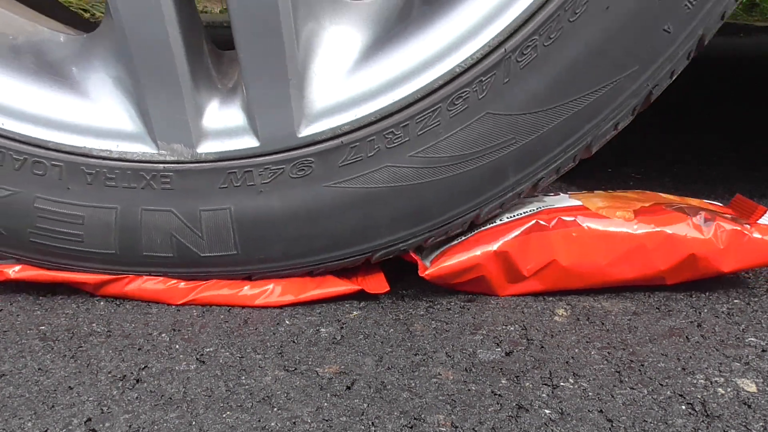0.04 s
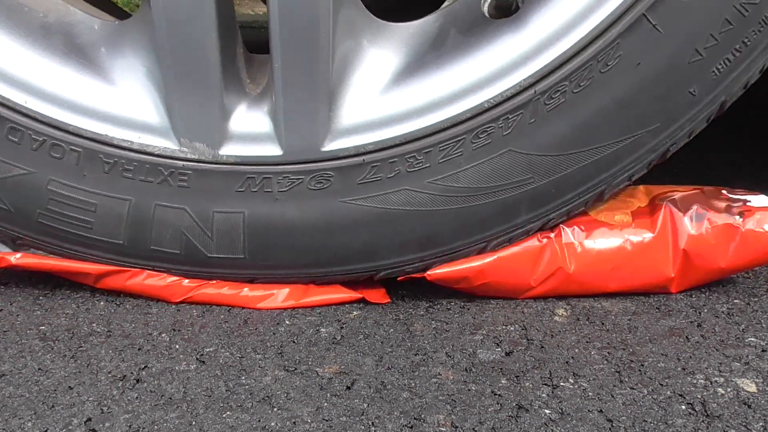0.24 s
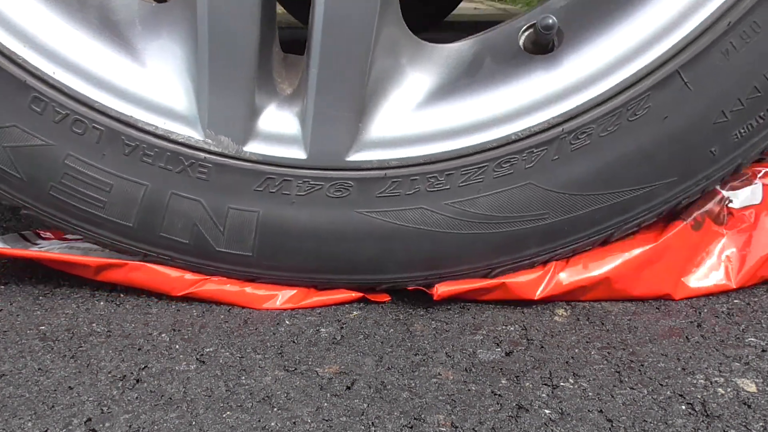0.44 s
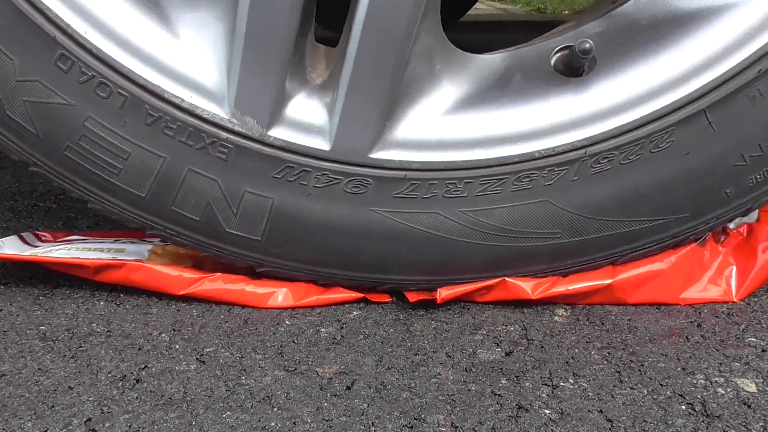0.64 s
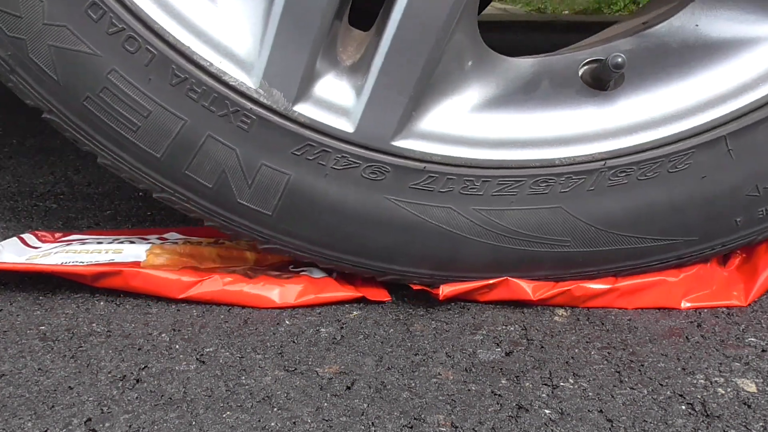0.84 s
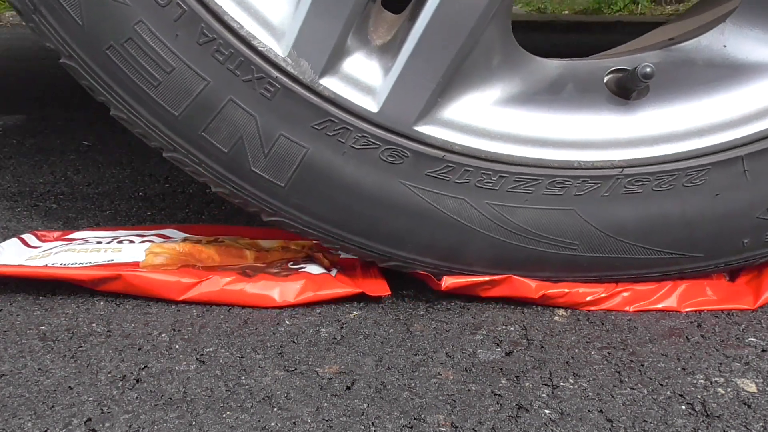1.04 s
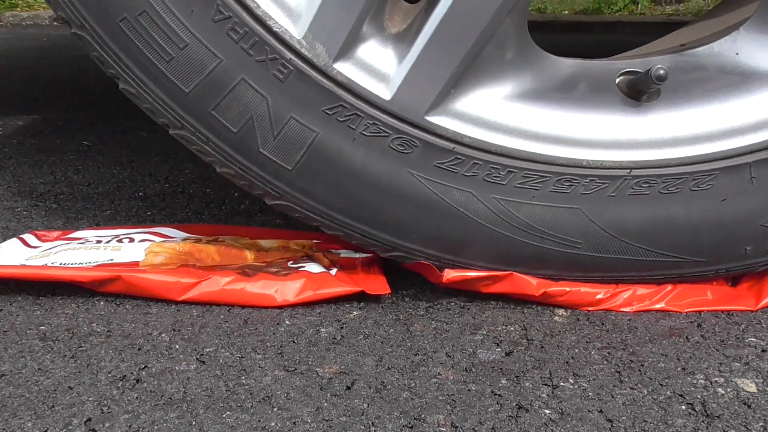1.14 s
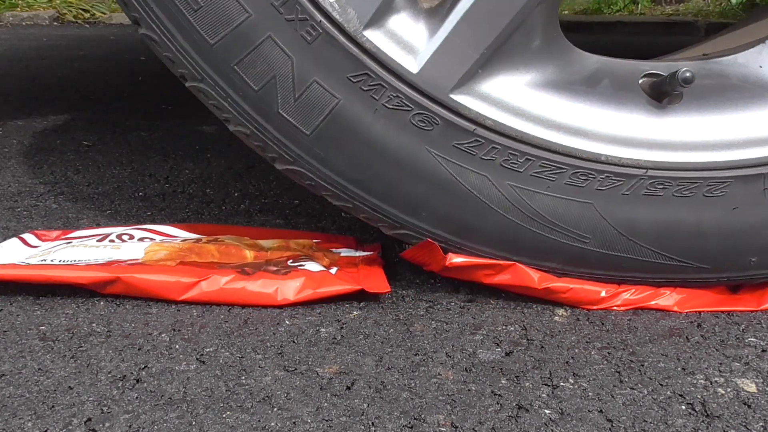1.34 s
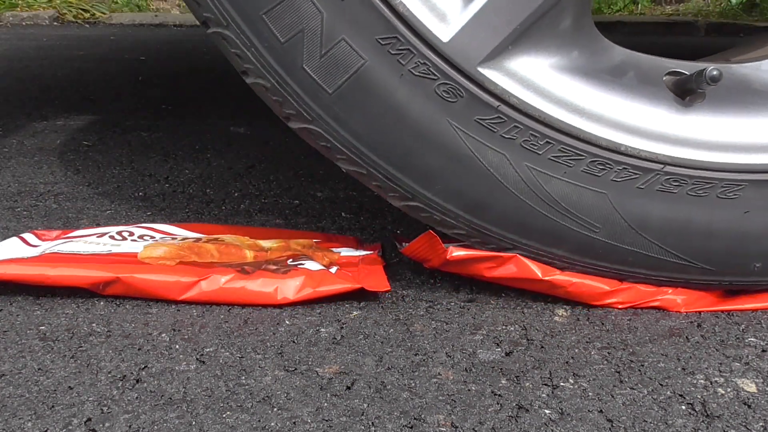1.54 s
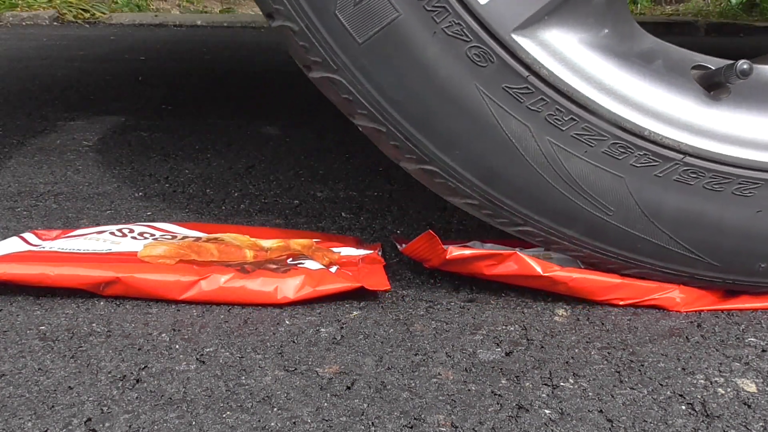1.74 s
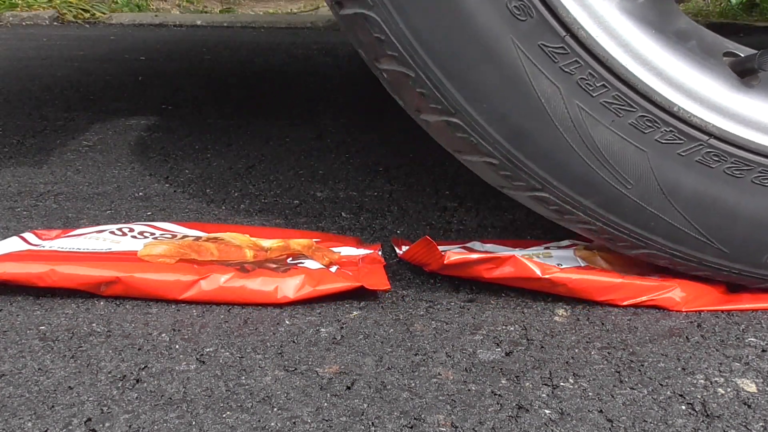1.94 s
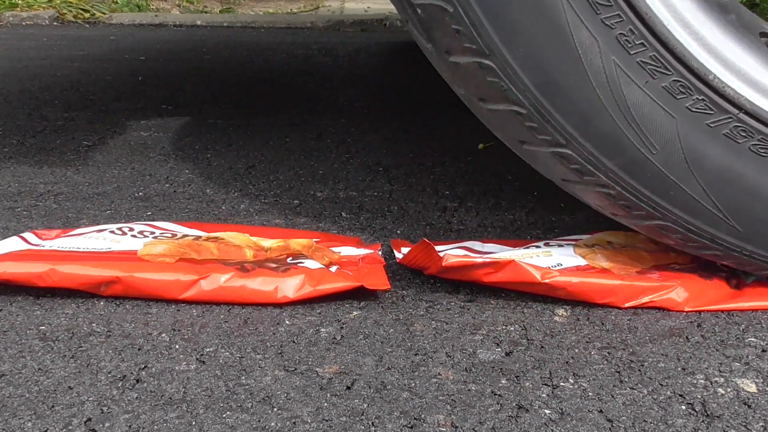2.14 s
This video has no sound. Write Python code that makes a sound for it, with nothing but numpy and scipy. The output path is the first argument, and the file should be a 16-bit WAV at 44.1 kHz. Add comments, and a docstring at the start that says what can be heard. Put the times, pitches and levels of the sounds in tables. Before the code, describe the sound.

Foil crisp bags crunch and snap under a tyre, heard very close outdoors; hollow pops quicken, a full bag bangs open with a short echo, then softer scattered crackles remain above low car rumble.

```python
"""Tyre rolling over snack packets

A car tyre rolls slowly over snack packets on asphalt, close to two microphones in the open.
Creasing film snaps as short resonant ticks, walls pop hollowly, and swarms of grains crinkle and crunch.
A full packet bursts as a tear of noise, decaying modes that sink in pitch and a short echo.
Softer crackles of the flattened packets follow, over filtered noise and a wavering hum of the car.
"""
import sys
import numpy as np
from scipy import signal
from scipy.fft import rfft, irfft
from scipy.io import wavfile

SR = 44100
rng = np.random.default_rng(int(sys.argv[2]) if len(sys.argv) > 2 else 0)


def unload_wav(signal):
    """Save mono or channel-first audio to the path in sys.argv[1] as 16-bit WAV at rate SR, clipped to [-1, 1]."""
    wavfile.write(
        sys.argv[1],
        SR,
        np.round(np.clip(np.atleast_2d(signal).T, -1, 1) * 32767).astype(np.int16),
    )


N = 97020  # length [samples]
SIDES = np.array([[1], [-1]])  # signs of the two channels
LEVEL_WINDOW_S = 0.003  # the level of a tick is its rms over this time
FLIP_CYCLES = 2.1  # decay of the ragged instant in which a fold gives way [periods of the tick]
RING_FLIP_DB, POP_FLIP_DB, THUD_FLIP_DB, GRAIN_FLIP_DB = -4, -12.5, -16, -4.5  # raggedness
# between the two microphones: mean lag, random spread of the lag, random spread of the level
LAG_S, LAG_SPREAD_S, PAN_SPREAD_DB = 1.2e-5, 1.4e-5, -2.5
CROWDING = 0.6  # how closely the rate of the grains follows their level [exponent]


def amp(db):
    """Decibels to gain."""
    return 10 ** (np.asarray(db) / 20)


def unit(x):
    """Scale to an rms of one."""
    return x / np.sqrt(np.mean(x ** 2))


def resonance(f, hz, q):
    """Response of a band-pass applied twice."""
    return 1 / (1 + 1j * q * (f / hz - hz / np.maximum(f, 1))) ** 2


def band(x, hz, q):
    """Pass a sound through one resonance."""
    f = np.fft.rfftfreq(N, 1 / SR)
    return irfft(rfft(x) * resonance(f, hz, q), N)


def colour(x, points):
    """Filter by (frequency [Hz], level [dB]) points, joined along log frequency."""
    hz, db = np.array(points).T
    f = np.fft.rfftfreq(N, 1 / SR)
    gain = amp(np.interp(np.log(f + 1), np.log(hz), db))
    return irfft(rfft(x) * gain, N)


def stereo_noise(apart):
    """White noise common to both channels plus a share of separate noise in each."""
    return rng.standard_normal(N) + apart * rng.standard_normal((2, N))


def decay(t, t60):
    """Exponential fall by 60 dB in t60 seconds."""
    return np.exp(-np.log(1000) * t / t60)


def ticks(times, db, hz, q, tail_db, tail_s, apart, flip_db, size=1024):
    """Each tick is a ragged impulse and a short scatter through its own resonance."""
    t, f = np.arange(size) / SR, np.fft.rfftfreq(size, 1 / SR)
    hz = hz[:, None, None]
    chance = rng.standard_normal((len(times), 3, size))
    common, separate = chance[:, :1], chance[:, 1:]

    def fade(length):
        return np.exp(-t / length) * np.sqrt(2 / (length * SR))

    apart = np.clip(apart, 0, 1)
    scatter = np.sqrt(1 - apart) * common + np.sqrt(apart) * separate
    scatter = scatter * fade(tail_s)
    flip = 1 + amp(flip_db) * rfft(common[..., ::-1] * fade(FLIP_CYCLES / hz))
    lag = LAG_S + LAG_SPREAD_S * common[..., -1:]
    delay = 4 / SR + SIDES * lag / 2  # four samples of headroom keep both delays positive
    pan = amp(SIDES * PAN_SPREAD_DB * chance[:, 1:2, -1:] / 2)
    direct = flip * np.exp(-2j * np.pi * f * delay) * pan
    sounds = irfft((direct + amp(tail_db) * rfft(scatter)) * resonance(f, hz, q), size)
    energy = np.sum(sounds ** 2, axis=(1, 2), keepdims=True)
    sounds /= np.sqrt(energy / (2 * LEVEL_WINDOW_S * SR))

    out = np.zeros((2, N + size))
    starts = np.clip(times * SR, 0, N - 1).astype(int)
    for start, gain, sound in zip(starts, amp(db), sounds):
        out[:, start:start + size] += gain * sound
    return out[:, :N]


def swarm(count, s, level_db, spread_db, group=20):
    """Times and levels of grains: they crowd where the crushing is hard, a strong one in every handful."""
    t = np.arange(N) / SR
    db = np.interp(t, s, level_db)
    rate = amp(CROWDING * db)
    rate = rate * count / (rate.sum() / SR)  # grains per second
    order = np.arange(count) + 2 * rng.random(count)
    times = np.interp(order, np.cumsum(rate) / SR, t)
    # ranks shuffled within each group; the cube leaves most grains faint
    rank = np.argsort(rng.random((count // group, group))).ravel()
    size_db = spread_db * ((rank + rng.random(count)) / group) ** 3
    # the summed power of overlapping grains follows the level curve
    power = np.mean(amp(size_db) ** 2) * LEVEL_WINDOW_S * np.interp(times, t, rate)
    return times, size_db + np.interp(times, t, db) - 10 * np.log10(power)


RING_Q, RING_TAIL_DB, RING_TAIL_S, RING_DB = 1.74, -8.5, 0.004, -1.5
BODY_HZ, BODY_Q, BODY_TAIL_DB, BODY_TAIL_S, BODY_DB = 3070, 0.39, 2.5, 0.004, 1
# Sharp snaps of the film, levels before the trims RING_DB and BODY_DB:
# (time [s], ring frequency [Hz], ring level [dB], level of the duller body [dB])
FILM_SNAPS = [(.0193, 10100, -27, -34), (0.034, 7960, -24, -37), (.098, 10100, -17, -29.5),
              (0.1239, 10900, -25, -29.5), (0.2166, 10000, -20, -29.5), (0.2198, 10900, -18.5, -28.5),
              (0.2522, 9600, -26, -46), (0.3041, 10900, -17.5, -32), (0.3602, 7200, -25.5, -26.5),
              (0.399, 9400, -20.5, -26), (.434, 9900, -21.5, -24), (0.4787, 11000, -15.5, -28.5),
              (0.5248, 9900, -25, -22), (0.5581, 10400, -17, -35), (.615, 10200, -28, -61),
              (0.7037, 9200, -33, -37), (.717, 8500, -41, -36), (0.9641, 10300, -34, -38),
              (0.986, 8800, -27, -37.5), (1.017, 7800, -33, -38), (1.0316, 8550, -19, -50),
              (1.058, 7000, -28, -34), (1.076, 7050, -22.5, -42), (1.0964, 7150, -25, -30),
              (1.1337, 9000, -27.5, -49), (1.1658, 7500, -21.5, -27), (1.294, 9900, -24.5, -41),
              (1.3443, 5630, -42, -36.5), (1.4002, 8800, -32, -48), (1.422, 9600, -28, -36.5),
              (1.458, 7740, -28, -34.5), (1.4815, 9100, -22.5, -27), (1.5076, 8300, -30, -52),
              (1.518, 10900, -31, -32), (1.527, 10600, -27.5, -34.5), (1.5448, 7620, -37, -47),
              (1.565, 8700, -24, -35), (1.6, 7460, -25.5, -29.5), (1.616, 7300, -29, -34.5),
              (1.6657, 7240, -32.5, -38), (1.7623, 9400, -26, -29.5), (1.7699, 7300, -23, -34),
              (1.7948, 10100, -24, -32.5), (1.877, 7500, -45, -37), (1.9226, 8100, -32, -41),
              (1.9885, 7840, -29, -34), (2.0525, 9900, -19, -46), (2.0765, 7900, -38, -51),
              (2.102, 10400, -31, -34.5), (2.1361, 7000, -34.5, -45)]


def snaps():
    """Creases flip over: a bright ring and a duller body."""
    s, hz, ring_db, body_db = np.array(FILM_SNAPS).T
    body_hz = BODY_HZ * np.exp(0.11 * rng.standard_normal(len(s)))
    ring = ticks(s, ring_db + RING_DB, hz, RING_Q, RING_TAIL_DB, RING_TAIL_S, 0.5, RING_FLIP_DB)
    body = ticks(s, body_db + BODY_DB, body_hz, BODY_Q, BODY_TAIL_DB, BODY_TAIL_S, 0.19, RING_FLIP_DB)
    return ring + body


BURST_S, BURST_RISE_S, BURST_LOW_HZ = 0.5563, 0.0012, 88  # start, rise, low cut
RING_TRIM_DB = 7  # added to every mode
BURST_SAG, BURST_SAG_S = 0.15, 0.0264  # share by which the pitch sinks as the packet slackens, and how soon
RIP_DB, RIP_S, RIP_HZ = -11.5, 0.0056, 5400  # the seam tears
ECHO_DB, ECHO_T60_S, ECHO_HZ = -22, 0.19, 580  # scatter from the car body and the street
# Ring of the bursting packet, pitch before it sinks and level before the trim:
# (frequency [Hz], level [dB], decay time to -60 dB [s])
PACKET_MODES = [(167.5, -15.5, 0.041), (338, -17, 0.055), (550, -7, 0.039), (610.4, -8.5, 0.059),
                (699, -9, 0.049), (854, -16.5, 0.045), (1000, -19.5, 0.041), (1280, -18.5, 0.029),
                (1920, -25, 0.024)]


def burst():
    """The seam rips, the freed air rings the slackening packet, and the surroundings answer."""
    t = np.maximum(np.arange(N) / SR - BURST_S, 0)
    rise = 1 - np.exp(-t / BURST_RISE_S)  # silent until the burst
    sag = BURST_SAG * np.minimum(t / BURST_SAG_S, 1) ** 2
    slack_time = t - np.cumsum(sag) / SR  # time runs slower, so every mode sinks
    ring = np.zeros(N)
    for hz, db, t60 in PACKET_MODES:
        ring -= amp(db) * np.sin(2 * np.pi * hz * slack_time) * decay(t, t60)
    rip = amp(RIP_DB) * unit(band(stereo_noise(0.76), RIP_HZ, 0.21)) * np.exp(-t / RIP_S)
    echo = amp(ECHO_DB) * unit(band(stereo_noise(0.69), ECHO_HZ, 1.42)) * decay(t, ECHO_T60_S)
    low_cut = signal.butter(2, BURST_LOW_HZ, "high", fs=SR, output="sos")
    return signal.sosfilt(low_cut, rise * (amp(RING_TRIM_DB) * ring + rip + echo))


POP_Q, POP_TAIL_DB, POP_TAIL_S, POP_TOP_HZ = 0.48, -5, 0.0071, 1420
# Pops of buckling packet walls and breaking crisps, levels before the treble cut:
# (time [s], level [dB], pitch [Hz])
WALL_POPS = [(0.125, -23, 460), (0.1771, -25, 850), (0.2184, -19.5, 836), (.246, -25.5, 776),
             (0.3207, -21, 580), (0.3597, -21.5, 408), (0.3986, -19.5, 1100), (0.41, -16, 1060),
             (0.4437, -10, 650), (0.5246, -13.5, 714), (.732, -30, 280), (0.964, -31.5, 990),
             (1.059, -28.5, 415), (1.0875, -26, 563), (1.1628, -28.5, 616), (1.2941, -31, 940),
             (1.465, -37, 240), (1.922, -32, 1100)]


def pops():
    """Hollow pops of the packet, one swing of its wall each, with little treble."""
    s, db, hz = np.array(WALL_POPS).T
    swings = ticks(s, db, hz, POP_Q, POP_TAIL_DB, POP_TAIL_S, 0.15, POP_FLIP_DB, size=4096)
    treble_cut = signal.butter(4, POP_TOP_HZ, fs=SR, output="sos")
    return signal.sosfilt(treble_cut, swings)


# Small crackles, as level curves of the film and of the crisps, played by crinkle() and crunch():
# (time [s], film treble level [dB], film middle level [dB], crisp crunch level [dB])
CRUSH_LEVELS = [(0, -40, -46, -33), (.03, -32, -36.5, -36.5), (.07, -40, -49, -40),
                (.14, -31.5, -37.5, -36.5), (.25, -29.5, -40.5, -35), (.32, -27, -34, -29.5),
                (.43, -30.5, -37, -37), (.5, -33.5, -43.5, -47), (.6, -51.5, -58.5, -54),
                (.69, -50, -56.5, -50), (0.738, -40, -42, -38), (0.809, -42, -55, -46),
                (.87, -41, -45, -41.5), (1.01, -43.5, -53.5, -49.5), (1.07, -40, -47.5, -40.5),
                (1.2, -47.5, -52, -57), (1.33, -42, -47.5, -52), (1.6, -47.5, -51, -52),
                (1.71, -34, -39, -48), (1.82, -44, -49, -54), (1.97, -49, -54.5, -55),
                (2.2, -47, -53.5, -49)]


def crinkle(count=1900):
    """A swarm of small creases, most faint and a few strong, each with a treble and a middle ring."""
    s, treble_db, middle_db, _ = np.array(CRUSH_LEVELS).T
    times, db = swarm(count, s, treble_db, 21.4)
    treble_hz = 7200 + 5000 * rng.random(count)
    middle_hz = 2200 + 2200 * rng.random(count)
    treble = ticks(times, db, treble_hz, 1.4, -3, 0.0022, 0.55, GRAIN_FLIP_DB, size=512)
    db = db + np.interp(times, s, middle_db - treble_db)
    middle = ticks(times, db, middle_hz, 1.13, -4.5, 0.0028, 0.064, GRAIN_FLIP_DB, size=512)
    return treble + middle


CRUNCH_LOW_HZ, CRUNCH_OCTAVES = 314, 2.26  # lowest grain, and the range above it


def crunch(count=900):
    """Crisps break in low, muffled grains inside the packet."""
    s, _, _, crunch_db = np.array(CRUSH_LEVELS).T
    times, db = swarm(count, s, crunch_db, 17.8)
    hz = CRUNCH_LOW_HZ * 2 ** (CRUNCH_OCTAVES * rng.random(count))
    return ticks(times, db, hz, 1.74, -1.7, 0.0036, 0.11, GRAIN_FLIP_DB)


THUD_HZ, THUD_Q, THUD_TAIL_DB, THUD_TAIL_S = 102, 1.37, 0.5, 0.02
SHAKE_DB, SHAKE_HZ, SHAKE_Q, SHAKE_FADE_DB_PER_S = -40, 105, 1.13, -7.5  # steadily fading rumble
# Low bumps that shake the microphones as the tread settles: (time [s], level [dB])
TREAD_BUMPS = [(0.024, -24), (.934, -22.5), (1.114, -28.5), (1.229, -29.5)]


def shake():
    """Low rumble and bumps shake the two microphones in opposite phase."""
    s, db = np.array(TREAD_BUMPS).T
    hz = np.full(len(s), THUD_HZ)
    bumps = ticks(s, db, hz, THUD_Q, THUD_TAIL_DB, THUD_TAIL_S, 0.59, THUD_FLIP_DB, size=4096)
    level_db = SHAKE_DB + SHAKE_FADE_DB_PER_S * np.arange(N) / SR
    rumble = amp(level_db) * unit(band(stereo_noise(0.5), SHAKE_HZ, SHAKE_Q))
    return (bumps + rumble) * SIDES


CAR_DB = -49  # rms level of the middle of the rush
HUM_OCTAVE_DB = -60.5  # rms level of the steady line an octave below the hum
# Spectrum of the rush, relative: (frequency [Hz], level per Hz [dB])
CAR_SPECTRUM = [(25, -13), (60, -2.5), (150, 0.5), (280, 4.5), (450, -8), (650, 1.5), (1200, -5.5),
                (1800, -24.5), (12000, -26)]
# Stereo width of the rush: (frequency [Hz], side over middle [dB])
RUSH_WIDTH = [(100, -18), (600, -8), (9000, 11)]
# Hum of the engine, level before the wavering: (time [s], pitch [Hz], rms level [dB])
ENGINE_HUM = [(.5, 222, -59), (.74, 222.1, -48), (1, 216.9, -65.5), (1.83, 199.7, -58), (2.05, 225.8, -59)]


def car():
    """Low rush of the car as coloured noise, and a faint wavering hum that sags and picks up."""
    middle = unit(colour(rng.standard_normal(N), CAR_SPECTRUM))
    side = unit(colour(rng.standard_normal(N), CAR_SPECTRUM))
    rush = amp(CAR_DB) * (middle + SIDES * colour(side, RUSH_WIDTH))
    t = np.arange(N) / SR
    s, pitch_hz, level_db = np.array(ENGINE_HUM).T
    phase = 2 * np.pi * np.cumsum(np.interp(t, s, pitch_hz)) / SR
    waver_db = 2 * unit(band(rng.standard_normal(N), 10.3, 0.57))
    hum = amp(np.interp(t, s, level_db) + waver_db) * np.sin(phase)
    octave = amp(HUM_OCTAVE_DB) * np.sin(phase / 2)
    return rush + np.sqrt(2) * (hum + octave)  # root two turns rms into peak


def scene():
    """Everything at the tyre, from the packets to the car behind them."""
    return snaps() + burst() + pops() + crinkle() + crunch() + shake() + car()


TREBLE_HZ, CLIP_LEVEL, TOP_HZ = 13560, 1.02, 16300  # treble roll-off, full-scale ceiling, upper limit


def record(dry):
    """The microphone softens the top octave, rounds off the loudest peaks and cuts off steeply."""
    soft = signal.sosfilt(signal.butter(3, TREBLE_HZ, fs=SR, output="sos"), dry)
    loud = soft / (1 + (soft / CLIP_LEVEL) ** 6) ** (1 / 6)
    return signal.sosfilt(signal.ellip(8, 0.2, 70, TOP_HZ, fs=SR, output="sos"), loud)


dry = scene()
out = record(dry)
unload_wav(out)
```